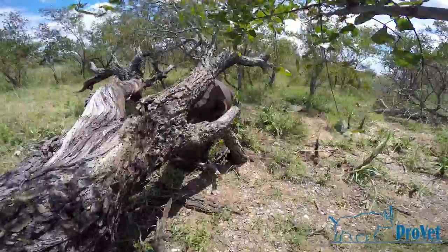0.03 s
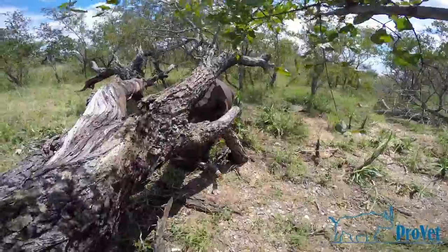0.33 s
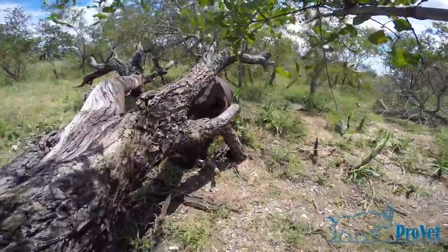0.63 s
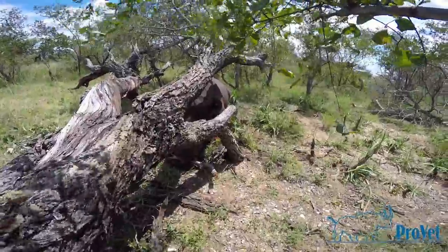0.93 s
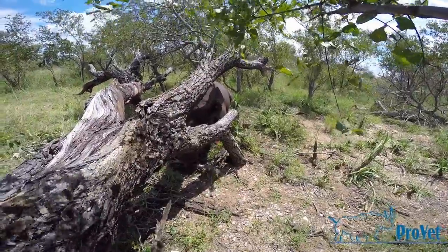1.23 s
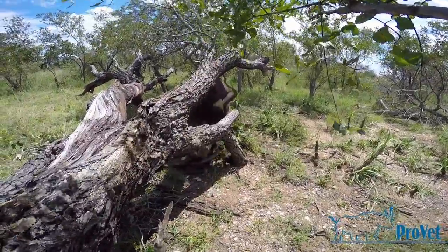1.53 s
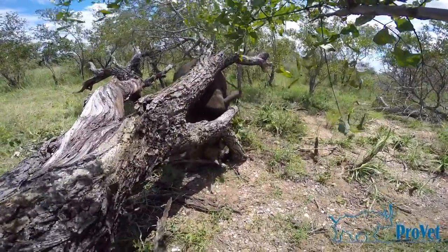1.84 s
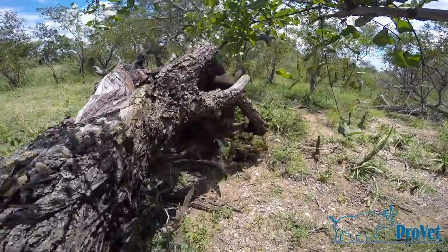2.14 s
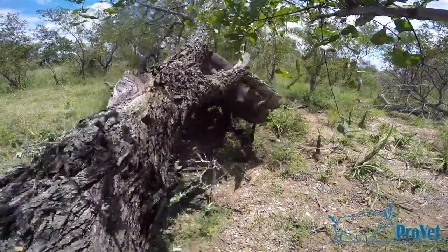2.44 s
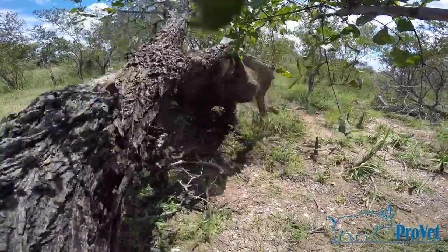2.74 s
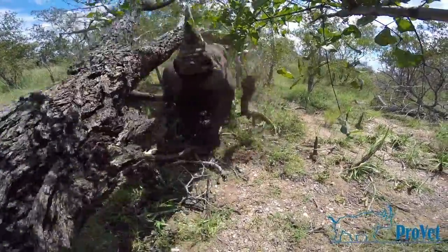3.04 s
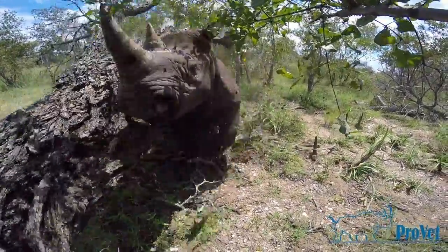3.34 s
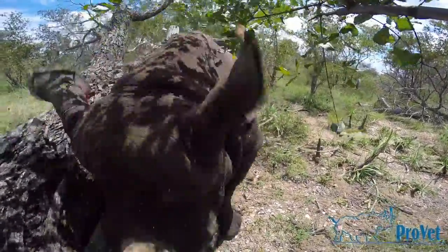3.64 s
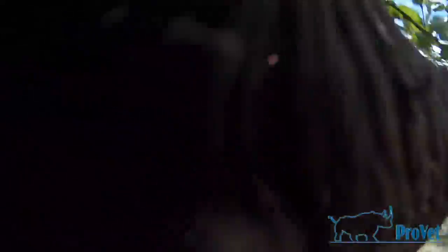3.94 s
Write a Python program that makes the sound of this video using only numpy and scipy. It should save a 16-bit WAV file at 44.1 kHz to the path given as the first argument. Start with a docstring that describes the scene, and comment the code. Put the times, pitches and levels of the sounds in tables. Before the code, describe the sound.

A heavy log shudders, creaks and grinds, heard from a microphone mounted on it outdoors. A rhino pushes it aside, cracking dry branches and thudding through rustling grass, then strikes the microphone's plastic case in loud, rattling knocks.

```python
"""A rhino gets up under a fallen trunk, shoves it aside and charges the camera fixed to it.
First hide rubs on the shuddering log and brush rustles. From 1.6 s dry branches snap, feet and log thud.
Near 2.2 s the log groans, then grinds: its bark sticks and slips, ringing the camera case.
At 3.8 s the animal rams the camera, which overloads and clatters."""
import sys
import numpy as np
from scipy import signal
from scipy.fft import rfft, irfft
from scipy.io import wavfile
from scipy.ndimage import map_coordinates

SR = 44100
rng = np.random.default_rng(int(sys.argv[2]) if len(sys.argv) > 2 else 0)


def generate_wav(signal):
    """Clip the signal to [-1, 1] and save it as 16-bit WAV at the path in sys.argv[1]."""
    frames = np.transpose(np.atleast_2d(signal))
    scaled = np.clip(frames, -1, 1) * 32767
    pcm = np.round(scaled).astype(np.int16)
    wavfile.write(sys.argv[1], SR, pcm)


N = 176400

# Spectrum of dry foliage. Each row: frequency in Hz, level in dB.
FOLIAGE_SPECTRUM = [(400, 5.5), (2400, 7.5), (3450, 7), (4900, -2.5), (6900, -3), (8900, -10), (10300, -8),
                    (11200, -14), (15000, -16.5)]


def amp(db):
    """dB to gain."""
    return 10 ** (np.asarray(db) / 20)


def unit(x):
    """Scale to rms 1."""
    return x / np.sqrt(np.mean(x ** 2) + 1e-20)


def level(rows):
    """Gain per sample from (s, dB) points."""
    return amp(np.interp(np.arange(N) / SR, *np.transpose(rows)))


def wobble(knots_per_s):
    """Smooth random curve."""
    return map_coordinates(rng.standard_normal(2048), [np.arange(N) * knots_per_s / SR], mode="wrap")


def colour(x, spectrum, tilt_db_oct=0, size=8192):
    """Unit-energy filter shaped by (Hz, dB) points and a tilt."""
    octave = np.log2(np.fft.rfftfreq(size, 1 / SR) + 1)
    hz, db = np.transpose(spectrum)
    gain_db = np.interp(octave, np.log2(hz), db) + tilt_db_oct * np.maximum(octave, np.log2(hz[1]))
    cepstrum = irfft(np.log(amp(gain_db)))
    cepstrum[1:size // 2] *= 2  # fold to minimum phase
    cepstrum[size // 2 + 1:] = 0
    impulse = irfft(np.exp(rfft(cepstrum)))
    return signal.fftconvolve(x, impulse / np.linalg.norm(impulse))[:len(x)]


def grains(per_s, spread_db, bed):
    """Random clicks of uneven size on a noise bed, rms 1."""
    clicks = (rng.random(N) < per_s / SR) * rng.choice([-1, 1], N)
    sizes = amp(spread_db * np.clip(rng.standard_normal(N), -2, 2))
    return unit(unit(clicks * sizes) + bed * rng.standard_normal(N))


def fade(t60_s):
    """Exponential decay, 0.25 s long."""
    return np.exp(-np.log(1000) * np.arange(SR // 4) / SR / t60_s)


def attack(rise_s):
    """Exponential rise to 1, 0.25 s long."""
    return 1 - np.exp(-np.arange(SR // 4) / SR / rise_s)


def ring(hz, t60_s):
    """Damped sine."""
    return fade(t60_s) * np.sin(2 * np.pi * hz * np.arange(SR // 4) / SR)


def burst(spectrum, t60_s, rise_s=0.0001, tilt_db_oct=0):
    """Decaying filtered noise with the rms of its envelope."""
    envelope = fade(t60_s) * attack(rise_s)
    noise = colour(envelope * rng.standard_normal(len(envelope)), spectrum, tilt_db_oct)
    return unit(noise) * np.sqrt(np.mean(envelope ** 2))


def add(track, start_s, sound):
    """Mix a sound into the track."""
    part = track[round(start_s * SR):][:len(sound)]
    part += sound[:len(part)]


def wood_spectrum(hz):
    """(Hz, dB) points of wood with one resonance."""
    return [(hz / 10, -32), (hz * 0.44, -14), (hz, 0), (hz * 1.47, -14), (hz * 6, -50)]


def slips(per_s, decay_s=0.012):
    """Stick-slip envelope of bark: uneven kicks, each dying into the next, rms 1."""
    gap, size = rng.random((2, 1024))
    onsets = (np.cumsum(0.5 + gap) * SR / per_s).astype(int)
    kicks = np.bincount(onsets, 0.5 + size)[:N]
    return unit(signal.lfilter([1], [1, -np.exp(-1 / (decay_s * SR))], kicks))


def brush():
    """Crushed stems crackle, single twigs tick, clumps crunch as they give way."""
    # Crushing of dry grass and twigs. Each row: time in seconds, level in dB.
    crush_levels = [(.1, -80.5), (1.2, -64), (1.49, -51.5), (1.54, -42.5), (1.68, -52), (1.76, -48.5),
                    (1.98, -50.5), (2.17, -39.5), (2.44, -38.5), (2.59, -56.5), (2.8, -37), (2.93, -40.5),
                    (3.47, -43), (3.56, -37), (3.755, -36.5), (3.77, -66)]
    # Bark and twigs splintering. Each row: start in seconds, level in dB, length in seconds.
    crunches = [(1.59, -38, 0.041), (1.7, -37.5, 0.033), (2.776, -22, 0.017), (3.327, -37.5, 0.06),
                (3.496, -26.5, 0.031), (3.623, -34.5, 0.052)]
    stems = unit(grains(per_s=1100, spread_db=4, bed=0.6) * amp(2 * wobble(knots_per_s=60)))
    twigs = np.zeros(N)
    for when, pitch, size in rng.random((500, 3)):
        hz = 2000 * 5.5 ** pitch
        add(twigs, when * N / SR, amp(20 * size) * ring(hz, t60_s=20 / hz))
    swell = np.zeros(N)
    for start_s, db, length_s in crunches:
        age = np.arange(SR // 2) / SR / length_s * np.e  # 1 at the peak
        add(swell, start_s, amp(db) * age * np.exp(1 - age))
    splinters = grains(per_s=1500, spread_db=4, bed=0.45) * swell
    crush = level(crush_levels)
    ticks = 0.5 * unit(twigs) * np.sqrt(crush / crush.max())  # twigs break only under real weight
    rustle = colour(stems + ticks, FOLIAGE_SPECTRUM) * crush
    return rustle + colour(splinters, FOLIAGE_SPECTRUM, tilt_db_oct=3)


def branches():
    """Each break: a sharp crack, a short two-mode ring, a trail of tearing fibres."""
    # Each row: start in seconds, level in dB, pitch in Hz, relative crack level in dB.
    snaps = [(1.5826, -13, 2690, -8), (1.62, -23, 4300, 3), (1.829, -29, 2780, -1.5),
             (2.0849, -28, 2350, -1), (2.4535, -3, 2040, -3), (2.483, -13, 2210, -13),
             (2.493, -21, 2210, -18), (2.502, -30, 3070, -14), (2.7205, -13.5, 1960, 8),
             (2.7333, -31, 1790, 8), (2.7666, -5, 2513, -7), (2.9214, -18, 3890, -8),
             (2.931, -6.5, 3225, -7)]
    rise_s = 0.00051
    out = np.zeros(N)
    for start_s, db, hz, crack_db in snaps:
        modes = ring(hz, t60_s=0.06) + 0.5 * ring(1.65 * hz, t60_s=0.03)
        wood = burst(wood_spectrum(hz), t60_s=0.026, rise_s=rise_s) + amp(-9.5) * modes
        crack = amp(crack_db) * burst(FOLIAGE_SPECTRUM, t60_s=0.017, rise_s=rise_s, tilt_db_oct=2)
        tearing = grains(per_s=250, spread_db=3, bed=0.15)[:SR // 4] * fade(t60_s=0.3)
        fibres = amp(-33) * colour(tearing, FOLIAGE_SPECTRUM)
        add(out, start_s, amp(db) * (wood + crack + fibres))
    return out


def thuds():
    """Footfalls, the log landing and the weight of the charge: a few low cycles each."""
    # Each row: start in seconds, level in dB, pitch in Hz, T60 in seconds.
    impacts = [(1.603, -14.5, 151, 0.097), (2.284, 8.5, 118, 0.027), (2.357, 0.5, 79, 0.1),
               (2.456, 8, 85.5, 0.06), (2.765, -7.5, 105, 0.09), (3.378, -7, 80.3, 0.18),
               (3.783, 7.5, 114.3, 0.081), (3.787, -1.5, 44.3, 0.32)]
    out = np.zeros(N)
    for start_s, db, hz, t60_s in impacts:
        add(out, start_s, amp(db) * ring(hz, t60_s) * attack(rise_s=0.0026))
    return out


def groan():
    """As the log starts to slide, its slips briefly lock to one wavering pitch."""
    start_s, length_s, pitch_hz, peak_db = 2.16, 0.065, 505, -17
    progress = np.clip((np.arange(N) / SR - start_s) / length_s, 0, 1)
    hz = pitch_hz * (1 + 0.012 * wobble(knots_per_s=150))
    phase = 2 * np.pi * np.cumsum(hz) / SR
    sawtooth = unit(sum(np.sin(k * phase) / k for k in range(1, 6)))
    return amp(peak_db) * sawtooth * np.sin(np.pi * progress)


def trunk():
    """The log shudders and creaks; rubbing hide and slipping bark ring the camera case."""
    # Resonances of log and case. Each row: frequency in Hz, level in dB.
    log_spectrum = [(20, -5.5), (45, -14.5), (70, 1), (115, -2), (170, -9), (230, -17), (300, -37),
                    (600, -90)]
    case_spectrum = [(150, -30), (335, -9), (385, -24), (505, -3.5), (640, -3), (715, -17.5), (780, -3),
                     (885, 5), (1010, -8.5), (1200, -5.5), (1400, -13.5), (1750, -22), (2400, -18),
                     (3000, -72), (16000, -115)]
    # Log shuddering, hide rubbing, log dragging. Each row: time in seconds, level in dB.
    shudder_levels = [(.1, -41), (.7, -36.5), (1.48, -34), (1.6, -23.5), (1.7, -31), (2.05, -35),
                      (2.2, -18), (2.29, -14.5), (2.53, -17.5), (2.61, -36.5), (2.74, -12.5), (2.95, -24.5),
                      (3.3, -28.5), (3.72, -22.5), (3.85, -26)]
    rub_levels = [(.1, -65), (.7, -49), (1.55, -46.5), (1.9, -53.5)]
    grind_levels = [(1.9, -54.5), (2.03, -37), (2.145, -27.5), (2.18, -14), (2.35, -15), (2.38, -25.5),
                    (2.44, -19.5), (2.53, -19.5), (2.6, -40.5), (2.71, -17.5), (2.88, -20), (2.93, -30.5),
                    (3.22, -28.5), (3.3, -33.5), (3.7, -30), (3.77, -43)]
    # Log catching and letting go. Each row: start in seconds, level in dB, pitch in Hz.
    jolts = [(.141, -40, 954), (0.964, -31, 899), (1.245, -29, 956), (1.696, -29, 1094),
             (1.76, -35.5, 1973), (2.011, -24, 1083), (2.228, -6.5, 930), (2.248, -7, 1127),
             (2.301, -7, 973), (2.335, -4, 837), (2.446, -4, 930), (2.486, -10, 920), (2.688, -11, 845),
             (2.709, -9.5, 970), (3.211, -15.5, 970), (3.242, -15.5, 886), (3.35, -14.5, 807),
             (3.708, -17.5, 1024)]
    jolt_t60_s, jolt_rise_s = 0.082, 0.0014
    shudder = grains(per_s=370, spread_db=4.5, bed=0.44)
    rumble = unit(colour(shudder, log_spectrum)) * level(shudder_levels)
    hide = grains(per_s=40, spread_db=3, bed=2) * amp(2 * wobble(knots_per_s=20))
    rub = colour(hide, case_spectrum, tilt_db_oct=-5.5) * level(rub_levels)
    grit = grains(per_s=1500, spread_db=1, bed=0.5)
    grind = colour(grit * slips(per_s=65) * level(grind_levels), case_spectrum)
    out = rumble + rub + grind
    for start_s, db, hz in jolts:
        creak = ring(hz, jolt_t60_s) * attack(jolt_rise_s)
        scrape = burst(wood_spectrum(hz), jolt_t60_s / 2, jolt_rise_s)
        add(out, start_s, amp(db) * (creak + 0.5 * scrape))
    return out


def ramming():
    """Each blow clacks on the plastic case, booms in the mount and leaves a faint rattle."""
    # Each row: start in seconds, level in dB.
    blows = [(3.7801, 6), (3.786, 0), (3.797, 0), (3.841, -5.5), (3.847, -2.5), (3.8675, -14.5),
             (3.9196, -4), (3.932, -7.5), (3.9426, -7), (3.9473, -2), (3.9894, -4.5), (3.9955, -4.5)]
    # Struck case and mount. Each row: frequency in Hz, level in dB.
    plastic_spectrum = [(200, -23), (480, 4), (900, 7.5), (1450, 0.5), (2400, 5.5), (4100, -12.5),
                        (6200, -19.5), (14000, -54)]
    mount_spectrum = [(50, -8), (150, 11), (270, 1), (600, -43.5)]
    out = np.zeros(N)
    for start_s, db in blows:
        rattle = amp(-29) * burst(plastic_spectrum, t60_s=0.37, tilt_db_oct=-4.5)
        boom = amp(db - 7.5) * burst(mount_spectrum, t60_s=0.044)  # larger share in heavier blows
        clack = burst(plastic_spectrum, t60_s=0.02)
        add(out, start_s, amp(db) * (clack + rattle + boom))
    return out


def scene():
    """All sources at one microphone."""
    return (trunk() + groan() + brush() + branches() + thuds() + ramming())[None]


def record(dry):
    """The camera adds hiss and a thin, high electronic whine, saturates and limits the band."""
    # Camera hiss. Each row: frequency in Hz, level in dB.
    hiss_spectrum = [(2000, -3.5), (15000, -20.5)]
    whine_hz, whine_rms_db = 12700, -71.5
    on_s, ramp_s, cutoff_hz = 0.083, 0.013, 15300
    t = np.arange(N) / SR
    whine = amp(whine_rms_db) * np.sqrt(2) * np.sin(2 * np.pi * whine_hz * t) * np.clip(2.8 - t, 0, 1)
    hiss = amp(-61) * colour(rng.standard_normal(N), hiss_spectrum)
    mix = (dry + hiss + whine) * np.clip((t - on_s) / ramp_s, 0, 1)
    saturated = mix / (1 + np.abs(mix) ** 6) ** (1 / 6)
    lowpass = signal.ellip(10, 0.1, 90, cutoff_hz, fs=SR, output="sos")
    return signal.sosfilt(lowpass, saturated)


dry = scene()
out = record(dry)
generate_wav(out)
```